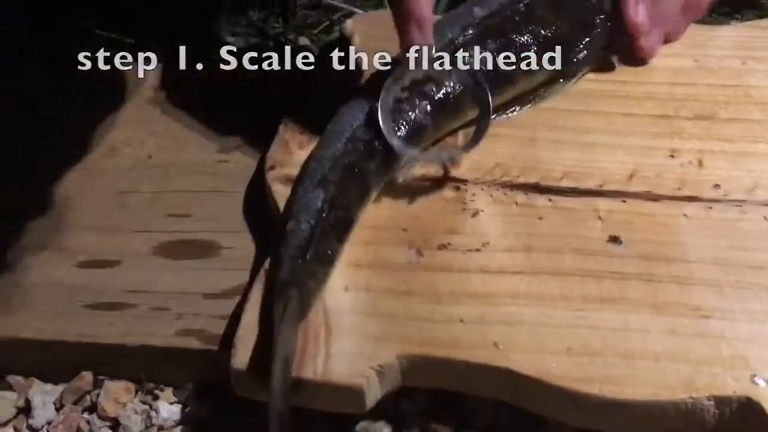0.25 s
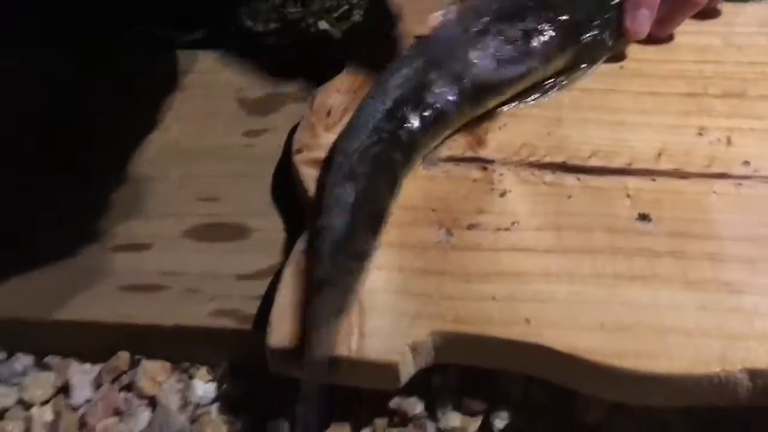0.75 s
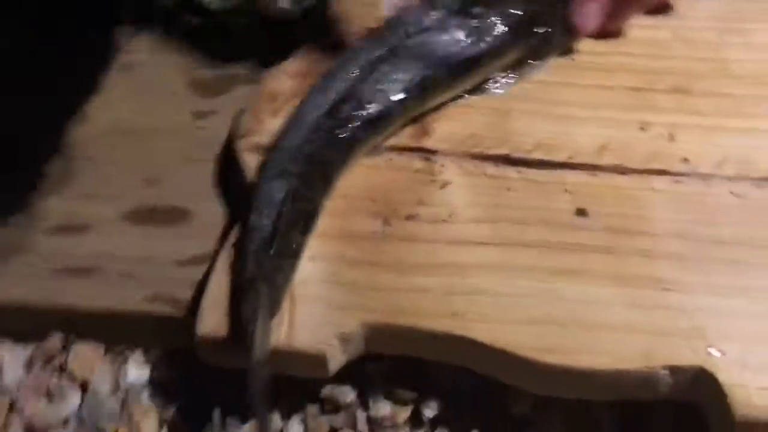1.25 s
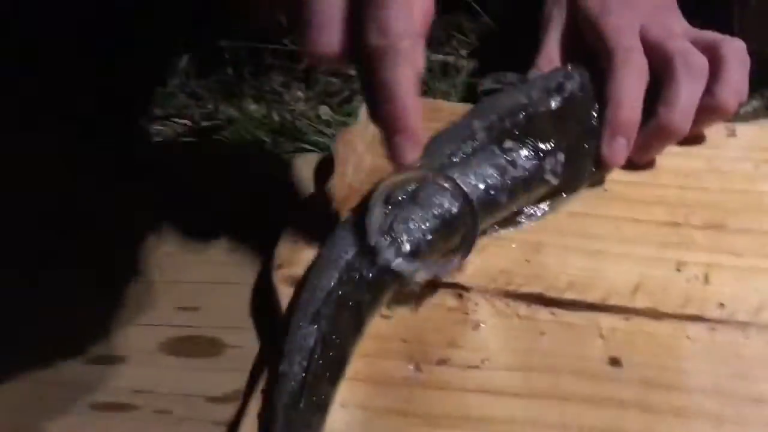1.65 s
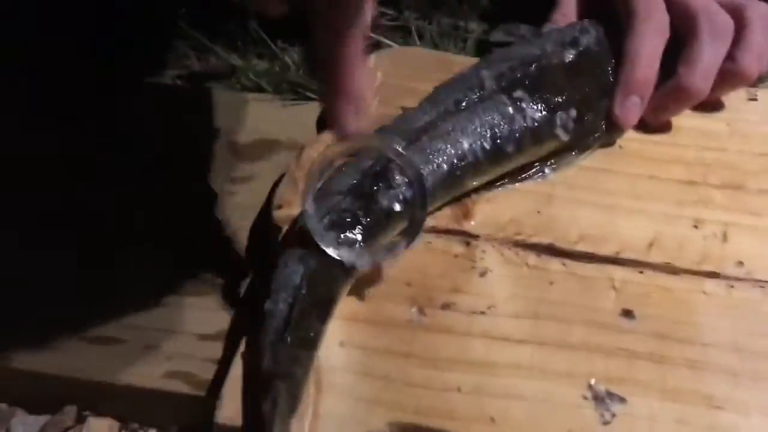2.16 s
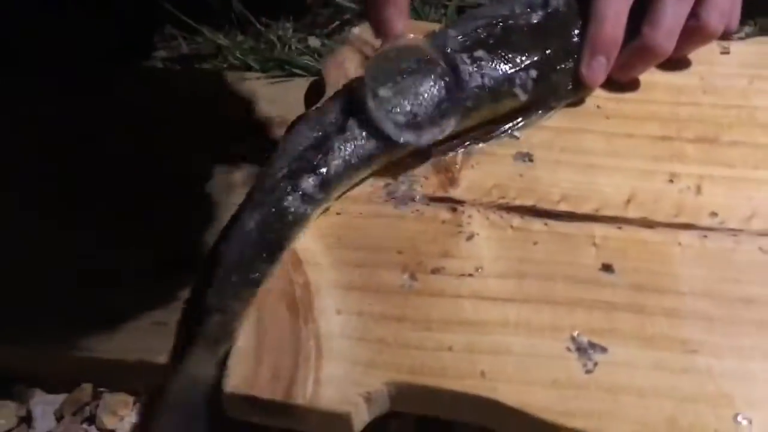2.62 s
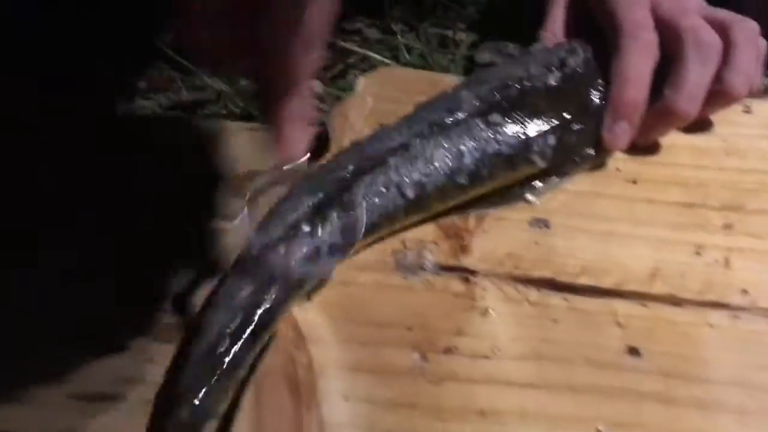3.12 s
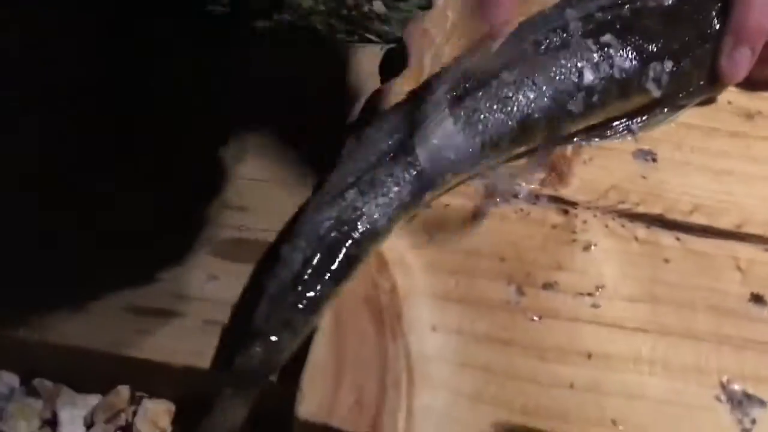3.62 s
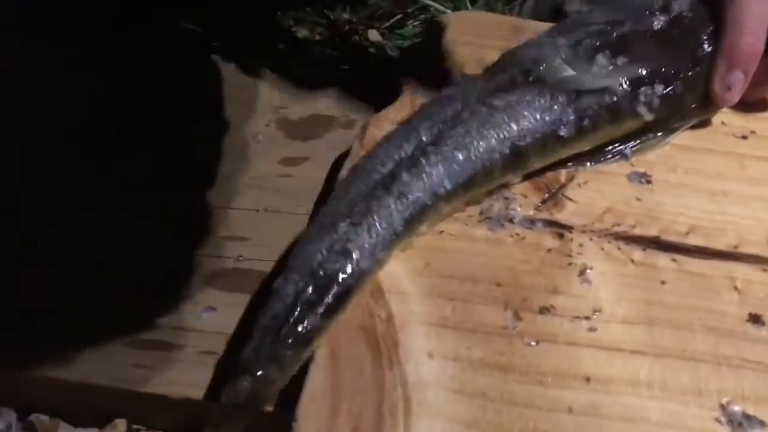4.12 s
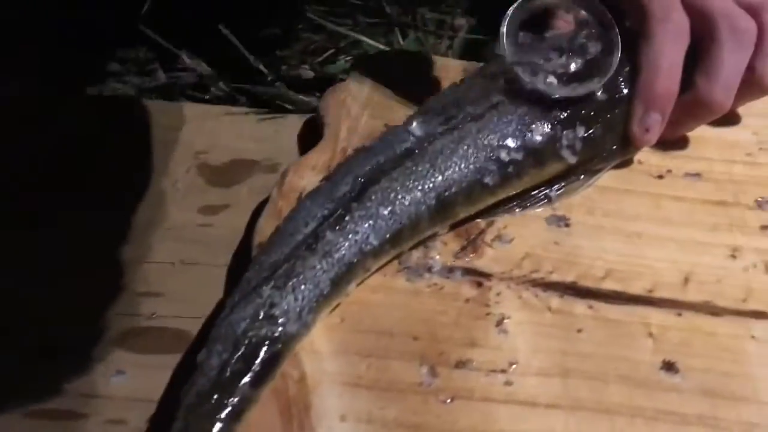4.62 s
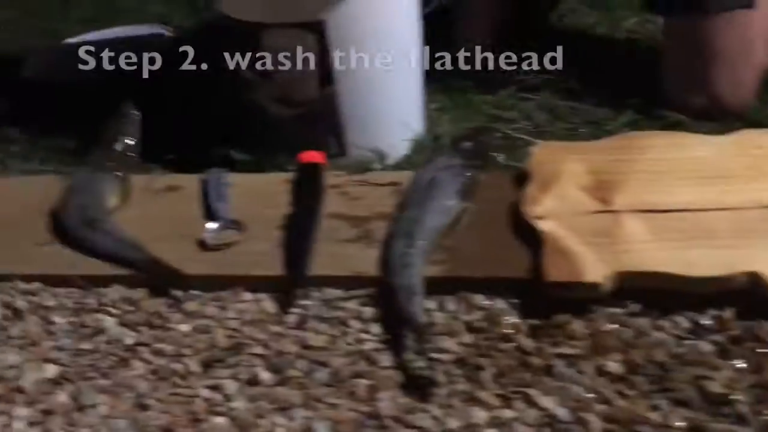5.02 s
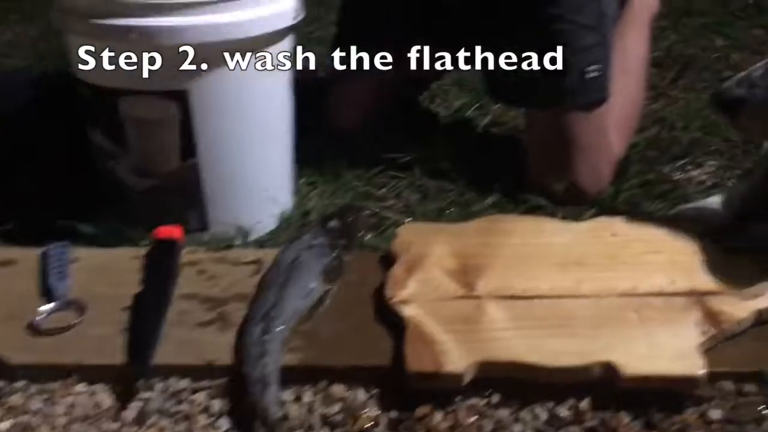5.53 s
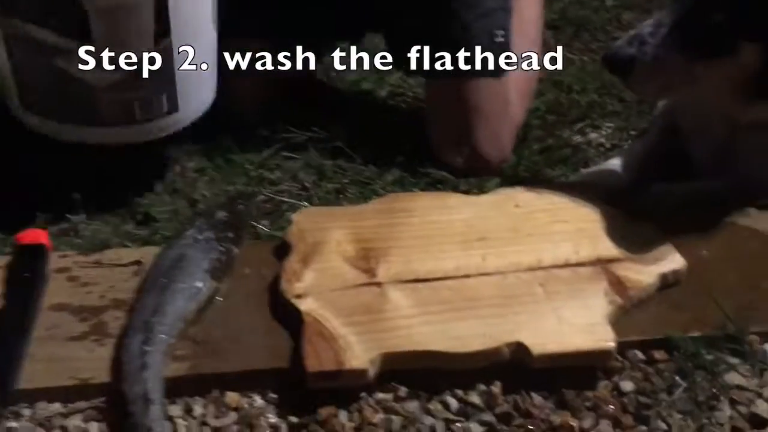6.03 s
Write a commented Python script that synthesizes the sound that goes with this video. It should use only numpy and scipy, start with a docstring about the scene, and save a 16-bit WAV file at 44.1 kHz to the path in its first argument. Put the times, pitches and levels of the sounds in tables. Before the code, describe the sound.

Quick rasping strokes scrape scales off a fish outdoors, then a plastic bucket knocks and scuffs on gravel over louder insect hiss.

```python
"""Scaling a fish at night

Outdoors, a toothed steel ring rasps the scales off a fish on a wooden board. The scales crackle
and snap free, the steel rings and the flesh and board shake. Then the scraping stops, the background
jumps louder, and a plastic bucket knocks and scuffs on gravel.
Insects hiss in the treble and far traffic rumbles throughout."""
import sys
import numpy as np
from scipy import signal
from scipy.fft import rfft, irfft, next_fast_len
from scipy.io import wavfile
from scipy.ndimage import uniform_filter1d, map_coordinates

SR = 44100
rng = np.random.default_rng(int(sys.argv[2]) if len(sys.argv) > 2 else 0)


def materialize(psi):
    """Save the field psi as 16-bit PCM at rate SR to the path in sys.argv[1].

    A 1-D psi becomes a single channel; in a 2-D psi each row is a channel.
    """
    bounded = np.clip(np.atleast_2d(psi).T, -1, 1)
    quanta = np.round(bounded * 32767).astype(np.int16)
    wavfile.write(sys.argv[1], SR, quanta)


N = 276507
BUCKET_SCENE_S = 4.945  # the scraping ends and the scuffing begins


def amp(db):
    """Turn decibels into a gain."""
    return 10 ** (np.asarray(db) / 20)


def unit(x):
    """Scale a signal to an average (rms) level of 1."""
    return x / np.sqrt(np.mean(x ** 2) + 1e-20)


def fade(t, ring_s):
    """A gain that falls by 60 dB in ring_s seconds."""
    return amp(-60 * t / ring_s)


def curves(rows):
    """Join the rows with lines: one value per sample for each column after the time."""
    times_s, *columns = np.transpose(rows)
    return [np.interp(np.arange(N) / SR, times_s, column) for column in columns]


def wobble(rate_hz):
    """A smooth curve through rate_hz random values a second."""
    knots = rng.standard_normal(int(N * rate_hz / SR) + 4)
    return map_coordinates(knots, [np.arange(N) * rate_hz / SR])


def filtered(x, response):
    """Multiply each frequency in x by response(hz)."""
    size = next_fast_len(N + SR // 2)
    return irfft(rfft(x, size) * response(np.fft.rfftfreq(size, 1 / SR)), size)[..., :N]


def colour(points):
    """A filter curve through (pitch_hz, level_db) points."""
    pitch_hz, level_db = np.transpose(points)
    return lambda hz: amp(np.interp(np.log(hz + 1), np.log(pitch_hz + 1), level_db))


def peaks(modes):
    """A filter with one resonance for each (pitch_hz, width_hz, level_db) row."""
    return lambda hz: sum((-1) ** k * amp(db) * 1j * hz * width / (pitch**2 - hz**2 + 1j * hz * width)
                          for k, (pitch, width, db) in enumerate(modes))


def grit(clicks_per_s, spread_db, clump_db, rub):
    """Random clicks of uneven size over rubbing noise, bunched in bursts."""
    clicks = (rng.random(N) < clicks_per_s / SR) * rng.standard_normal(N)
    clicks *= amp(spread_db * rng.standard_normal(N))
    bursts = amp(clump_db * wobble(90))
    return unit(bursts * (unit(clicks) + rub * rng.standard_normal(N)))


def patchy(x, depth_db, bins):
    """Random patches of pitch grow louder and softer as the point of contact wanders."""
    spectrum = signal.stft(x, nperseg=512)[2]
    patches = uniform_filter1d(rng.standard_normal(spectrum.shape), size=bins, axis=0)
    patches = uniform_filter1d(patches, size=5, axis=1)
    return unit(signal.istft(spectrum * amp(depth_db * unit(patches)), nperseg=512)[1][:N])


# The tone of far traffic, still air and a katydid chorus: pitch_hz, level_db
TRAFFIC_TONE = [(20, -24), (45, -7.5), (65, 4), (80, -3), (100, -1), (125, -5), (200, -8.5), (290, -11),
                (440, -33.5), (800, -31), (1300, -120)]
HUSH_TONE = [(180, -60), (300, -8), (478, -6), (2030, -15), (2980, -16.5), (8360, -22), (11500, -12),
             (16000, -25.5)]
KATYDID_TONE = [(7000, -33), (8300, -43), (9000, -6), (9800, 0.5), (10500, -14.5), (11200, -0.5),
                (12100, -12.5), (12600, -7), (12900, 1.5), (13300, -11), (13700, -5), (14200, -12),
                (15700, -28)]
# The lower calls of crickets: pitch_hz, width_hz, level_db
CRICKET_BANDS = [(1975, 95, 1), (3610, 240, -14)]
# How loud the background is: time_s, katydids_db, crickets_db, hush_db, traffic_db
NIGHT_LEVELS = [(0, -87, -83.5, -76, -75), (.28, -80.5, -84.5, -75, -69.5), (.52, -80, -86.5, -81, -71.5),
                (1.2, -80.5, -85.5, -75, -68.5), (3.9, -81.5, -87.5, -83, -67),
                (4.94, -81.5, -93, -83.5, -69), (4.955, -54, -58, -50, -46), (6.27, -54, -59.5, -73, -46)]


def night():
    """Flickering insects, a distant hush and surging traffic, each made of shaped noise."""
    katydids_db, crickets_db, hush_db, traffic_db = curves(NIGHT_LEVELS)
    tones = colour(KATYDID_TONE), peaks(CRICKET_BANDS), colour(HUSH_TONE), colour(TRAFFIC_TONE)
    katydids, crickets, hush, traffic = (unit(filtered(rng.standard_normal(N), tone)) for tone in tones)
    katydids *= amp(katydids_db + 0.93 * wobble(40))
    crickets *= amp(crickets_db + 2.2 * wobble(25))
    traffic *= amp(traffic_db + 1.5 * wobble(9))
    return katydids + crickets + amp(hush_db) * hush + traffic


# The tone of the ground's high rustle and low grind: pitch_hz, level_db
RUSTLE_TONE = [(1200, -15), (2500, -16), (5000, -8.5), (7500, -7.5), (11000, -8.5), (16000, -10.5)]
GRIND_TONE = [(210, -47), (350, 5), (585, -3.5), (1130, 1), (1700, -7.5), (1980, -12.5), (2580, -14.5),
              (4500, -21.5), (5850, -67), (9900, -120)]
# How loud the scuffing is: time_s, rustle_db, grind_db
SCUFF_LEVELS = [(4.94, -50, -97), (5.006, -48, -91), (5.124, -52.5, -42), (5.18, -63, -48),
                (5.276, -84.5, -50.5), (5.368, -82, -55), (5.628, -50, -52.5), (5.836, -63, -52.5),
                (6.062, -66, -58.5), (6.27, -73.5, -57)]


def scuffing():
    """Feet and bucket stir gravel and grass."""
    rustle_db, grind_db = curves(SCUFF_LEVELS)
    fade_in = np.clip((np.arange(N) / SR - BUCKET_SCENE_S) / 0.012, 0, 1)
    rustle = unit(filtered(grit(1200, spread_db=8.5, clump_db=-0.5, rub=0.83), colour(RUSTLE_TONE)))
    grind = filtered(grit(500, spread_db=-1.5, clump_db=1.5, rub=2.4), colour(GRIND_TONE))
    grind = patchy(grind, depth_db=3.9, bins=3)
    return fade_in * (amp(rustle_db) * rustle + amp(grind_db) * grind)


def ringing(modes, t, stretch):
    """The fading notes of a struck object, a little different in level and pitch each time."""
    return sum(amp(db + rng.normal(0, 1.1)) * fade(t, ring_s * stretch)
               * np.sin(2 * np.pi * (hz * rng.normal(1, 0.012) * t + rng.random()))
               for hz, db, ring_s in modes)


# The notes of the bucket's wall, and of its thin rim and handle: pitch_hz, level_db, ring_s
WALL_NOTES = [(270, -11.5, 0.11), (398, -19, 0.11), (622, -11.5, 0.1), (832, -3, 0.11), (1020, -1.5, 0.04),
              (1185, -1, 0.045), (1305, -5, 0.1), (1580, -3, 0.044), (1920, -28, 0.023), (2184, -3, 0.045),
              (2550, -5, 0.029)]
RIM_NOTES = [(3160, -5.5, .03), (3577, 1.5, 0.028), (4610, -8, 0.041), (5350, 0, 0.019),
             (6160, -1.5, 0.023)]
# Each knock: start_s, level_db, rim_db, stretch, note_hz, note_db
# (stretch multiplies the ring times; rim_db and note_db add to level_db)
BUCKET_KNOCKS = [(5.1073, -20.5, -0.5, 0.73, 1215, 4.5), (5.129, -21.5, -4, 0.6, 2446, 0.5),
                 (5.144, -26.5, -10, 0.57, 837, 5.5), (5.163, -48, -13, 1, 6540, 0),
                 (5.233, -41, -8, 0.55, 1140, 4), (5.26, -42.5, -5, 0.42, 2580, 8),
                 (5.281, -37, -12.5, 2, 828, -12), (5.289, -37.5, 0, 0.5, 6360, 4.5),
                 (5.317, -39, -27, 0.97, 1490, -2), (5.37, -40.5, -13, 0.87, 657, 7),
                 (5.391, -44, -1.5, 0.55, 860, -3), (5.407, -45.5, -7, 1.7, 2670, -1),
                 (5.419, -42.5, -31, 0.76, 1205, 10.5), (5.552, -27.5, -5.5, 0.74, 1160, 3),
                 (5.5598, -17.5, -3.5, 0.84, 830, -4.5), (5.614, -44.5, -1, 0.63, 2630, 6),
                 (5.668, -41.5, -12, 1, 1940, 6), (5.682, -38.5, -3.5, 1.35, 855, 8.5),
                 (5.7183, -17, -7.5, 0.66, 1366, 1.5), (5.7225, -17.5, -33, 0.27, 1470, 5),
                 (5.731, -32.5, -32, 0.85, 1316, 8), (5.761, -47.5, -30, 2.4, 1370, 4),
                 (6.008, -46.5, -15, 1.43, 1100, 9.5), (6.112, -49.5, 2, 0.36, 2880, 2),
                 (6.245, -49.5, -12, 0.27, 2880, 14.5)]


def bucket():
    """Each knock rings the wall, the rim and one note of its own, with a fading rattle of noise."""
    out, t = np.zeros(N + SR), np.arange(SR // 4) / SR
    thud_band = signal.butter(3, [380, 2500], "bandpass", fs=SR)
    tick_band = signal.butter(2, [2500, 9000], "bandpass", fs=SR)
    rim_rise = 1 - np.exp(-t / 0.001)
    wall_rise = 1 - np.exp(-t / 0.0016)  # the wall takes a few cycles to get going
    for start_s, level_db, rim_db, stretch, note_hz, note_db in BUCKET_KNOCKS:
        noise = rng.standard_normal((2, len(t)))
        thud = 3.18 * fade(t, 0.077 * stretch) * signal.lfilter(*thud_band, noise[0])
        tick = 1.08 * fade(t, 0.036 * stretch) * signal.lfilter(*tick_band, noise[1])
        wall = ringing(WALL_NOTES, t, stretch) + thud
        rim = ringing(RIM_NOTES, t, stretch) + tick
        drift = 0.35 * np.cumsum(noise[0]) * np.sqrt(note_hz / SR)  # roughens the note
        note = amp(note_db) * fade(t, 0.081 * stretch) * np.sin(2 * np.pi * note_hz * t + drift)
        knock = wall_rise * (wall + note) + rim_rise * amp(rim_db) * rim
        out[round(start_s * SR):][:len(t)] += amp(level_db) * knock
    return out[:N]


# Single scales snapping free: start_s, click_db, brightness (0 to 1), pop_db, pop_hz
SCALE_SNAPS = [(0.0727, -40, .5, -62, 1480), (0.1015, -52, .5, -55, 1890), (0.1602, -44, .4, -62, 1490),
               (0.19, -47.5, 0.4, -50.5, 2170), (0.214, -50, .7, -63, 872), (0.354, -51, 0.2, -55, 2030),
               (0.435, -52, 0, -54.5, 870), (0.4606, -55, .3, -64, 2040), (0.853, -37.5, 1, -60, 504),
               (0.8692, -30, 1, -56, 509), (0.8868, -27.5, 1, -52, 780), (1.057, -51, 0, -54, 2000),
               (1.0926, -48, .7, -56, 1550), (1.1154, -30, 0.7, -50, 1250), (1.3452, -27, 1, -66, 522),
               (1.4052, -41, .4, -44, 2380), (1.5207, -51, .1, -54, 1180), (1.6087, -51, .4, -44, 2600),
               (1.985, -44, 1, -70, 2600), (2.0132, -39, 0.8, -76, 3460), (2.333, -36.5, 0.9, -60, 2780),
               (2.3522, -29.5, 0.7, -48, 2520), (2.6253, -39, .9, -56, 2530), (2.6616, -30, .9, -54, 2580),
               (2.6813, -29, .9, -56, 2600), (3.3457, -51, .3, -46, 1460), (3.375, -39, .4, -49.5, 1620),
               (3.3907, -45, 0.2, -55, 1180), (3.5123, -49, 0.4, -68, 2500), (3.713, -43, .6, -69, 608),
               (3.859, -64, .05, -42.5, 626), (4.095, -44, 0, -40, 1670), (4.1802, -54, 0.2, -40.5, 2050),
               (4.252, -40, 0.2, -51, 1990), (4.37, -49, 0.5, -77, 654), (4.4344, -44, 0.4, -50, 1670),
               (4.48, -26.5, .6, -44, 2200), (4.522, -31.5, 0.66, -69, 2730), (4.737, -34, 1, -65, 2600)]
# Hard knocks of the steel ring: the same columns, then ring_s (capped at 0.12 when played)
STEEL_TAPS = [(3.294, -25.5, 0.8, -50, 3100, 0.16), (3.6497, -17.5, 0.12, -28, 695, 0.0029),
              (4.2715, -18, 0.14, -26, 617, 0.0031)]
# The two tones that brightness blends: pitch_hz, width_hz, level_db
DULL_CLICK, BRIGHT_CLICK = [(4360, 8600, 2.7)], [(12200, 8400, 1.6)]
SNAP_RING_S = 0.0096


def snaps_and_taps():
    """Each is a sharp click, a pop at the pitch of what was struck and a thud in the board."""
    clicks, pops, t = np.zeros((2, N + SR)), np.zeros(N + SR), np.arange(SR // 10) / SR
    thud = fade(t, 0.017) * np.sin(2 * np.pi * 260 * t)
    snaps = [(*row, SNAP_RING_S) for row in SCALE_SNAPS]
    for start_s, click_db, brightness, pop_db, pop_hz, ring_s in snaps + STEEL_TAPS:
        start = round(start_s * SR)
        fading = fade(t, min(ring_s, 0.12))
        fizz = 30 * min(ring_s, 0.016) * np.minimum(fading, fade(t, 0.025)) * rng.standard_normal(len(t))
        fizz[:2] = -1  # the click itself
        clicks[:, start:][:, :len(t)] += amp(click_db) * np.outer([1 - brightness, brightness], fizz)
        pops[start:][:len(t)] += amp(pop_db) * (fading * np.sin(2 * np.pi * pop_hz * t) + 0.1 * thud)
    dull, bright = clicks[:, :N]
    return filtered(dull, peaks(DULL_CLICK)) + filtered(bright, peaks(BRIGHT_CLICK)) + pops[:N]


# Each stroke of the steel ring: start_s, rise_s, hold_s, fall_s, crackle_db, flesh_db, steel_db
SCRAPE_STROKES = [(0.0, 0.071, 0.064, 0.012, -58.5, -73, -87),
                  (0.226, 0.013, 0.0082, .015, -64.5, -79, -92), (0.52, 0.033, 0.061, .02, -68.5, -80, -84),
                  (0.573, 0.031, 0.075, 0.022, -56.5, -69, -68.5),
                  (0.836, .015, 0.056, 0.077, -55.5, -65.5, -67),
                  (1.079, 0.023, 0.056, 0.026, -50.5, -59.5, -61),
                  (1.188, 0.039, 0.053, 0.12, -63.5, -66, -77), (1.337, 0.011, .01, .02, -54.5, -72, -70),
                  (1.331, 0.026, .055, .035, -55, -61, -63),
                  (1.531, 0.071, 0.027, 0.037, -47.5, -57, -55.5),
                  (1.799, 0.0093, 0.033, 0.074, -56.5, -63, -60.5),
                  (1.888, 0.021, 0.016, 0.048, -60, -80, -88),
                  (2.056, 0.012, 0.024, 0.014, -54.5, -59.5, -58),
                  (2.103, 0.011, 0.016, 0.14, -59, -62.5, -66.5),
                  (2.314, 0.032, 0.062, 0.021, -59, -64.5, -61.5),
                  (2.611, 0.021, 0.011, 0.019, -56.5, -76, -67),
                  (2.633, 0.04, 0.062, 0.027, -57, -64, -59.5),
                  (2.902, 0.058, 0.049, 0.057, -56, -58.5, -61.5),
                  (3.207, 0.048, .01, 0.037, -54.5, -60.5, -61),
                  (3.287, 0.0094, 0.018, .09, -49.5, -55.5, -59),
                  (3.543, 0.036, 0.057, .015, -55.5, -57, -62.5),
                  (3.645, 0.0078, 0.012, 0.028, -51, -53.5, -53.5), (3.82, .012, 0.019, .02, -70, -86, -80),
                  (3.849, 0.0094, 0.0092, 0.013, -80, -56.5, -63),
                  (3.876, 0.029, .115, 0.052, -59.5, -58, -63),
                  (3.919, 0.038, 0.015, 0.044, -55.5, -53, -54),
                  (4.155, .012, 0.064, 0.046, -59, -66, -69.5),
                  (4.251, 0.017, 0.0043, 0.017, -57, -56, -76), (4.418, .018, .012, 0.024, -58, -59, -64),
                  (4.467, 0.013, 0.031, 0.044, -53.5, -58.5, -66),
                  (4.671, 0.017, 0.038, 0.058, -54.5, -55, -62.5)]
# The ring sliding back between strokes: crackle_db, flesh_db, steel_db
SLIDE_LEVELS = [-79.5, -81.5, -88]
SLIDE_START_S, STROKE_SWELL_DB = 0.52, 27.5


def stroke_gains():
    """Gains for crackle, flesh and steel: each stroke swells, holds and fades over the quiet slide."""
    t = np.arange(N) / SR
    gains = np.outer(amp(SLIDE_LEVELS), t > SLIDE_START_S)
    for start_s, rise_s, hold_s, fall_s, *levels_db in SCRAPE_STROKES:
        corners_s = start_s + np.cumsum([0, rise_s, hold_s, fall_s])
        shape_db = np.interp(t, corners_s, [-STROKE_SWELL_DB, 0, 0, -STROKE_SWELL_DB], -200, -200)
        gains = np.hypot(gains, np.outer(amp(levels_db), amp(shape_db)))
    return gains * (t < BUCKET_SCENE_S)


# The tone of crackling scales: pitch_hz, level_db
CRACKLE_TONE = [(1500, -17), (2500, -11.5), (4000, -10), (5000, -14), (5650, -0.5), (6300, -7.5),
                (7000, -6), (8300, -6), (9500, -5.5), (12000, -6.5), (14800, -7), (16500, -6.5)]
# Where the fish on its board, and the steel ring, resonate: pitch_hz, width_hz, level_db
FLESH_BANDS = [(349, 130, -0.5), (674, 555, -1), (1046, 940, -3), (1695, 264, -3.5), (3560, 1300, -17)]
STEEL_BANDS = [(2243, 290, 6), (2592, 380, 9), (3230, 114, 4.5), (5640, 82, 7), (6780, 850, -2)]


def scraping():
    """The teeth flick scales loose, which crackles and rings the steel; rubbing shakes fish and board."""
    flicks = grit(2200, spread_db=4.5, clump_db=3.0, rub=0.58)
    crackle = patchy(filtered(flicks, colour(CRACKLE_TONE)), depth_db=2.5, bins=30)
    ring = peaks(STEEL_BANDS)
    steel = unit(filtered(flicks, lambda hz: ring(hz) * np.abs(ring(hz))))  # twice, for sharper peaks
    rubbing = grit(2500, spread_db=2, clump_db=1.5, rub=1.5)
    flesh = patchy(filtered(rubbing, peaks(FLESH_BANDS)), depth_db=3.5, bins=3)
    return np.sum(stroke_gains() * [crackle, flesh, steel], axis=0)


def scene():
    """Add all the sources into one channel."""
    return (scraping() + snaps_and_taps() + bucket() + scuffing() + night())[None]


def record(dry):
    """Remove the very highest treble."""
    return filtered(dry, lambda hz: hz < 15800)


dry = scene()
out = record(dry)
materialize(out)
```